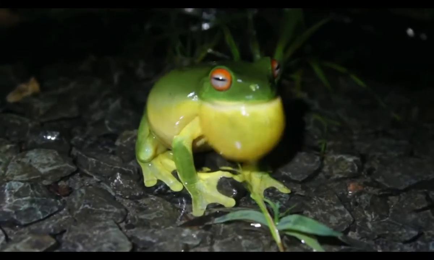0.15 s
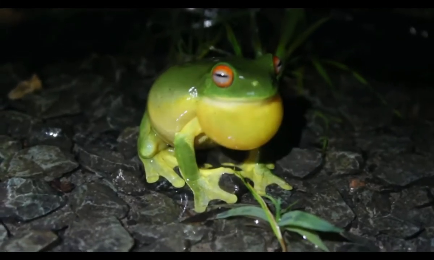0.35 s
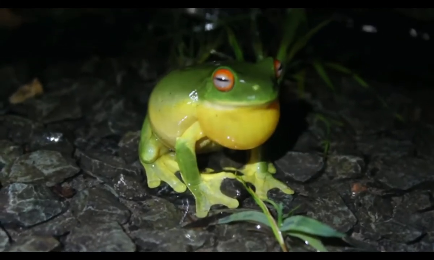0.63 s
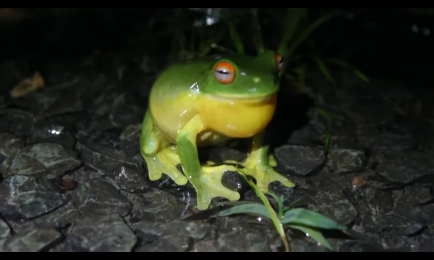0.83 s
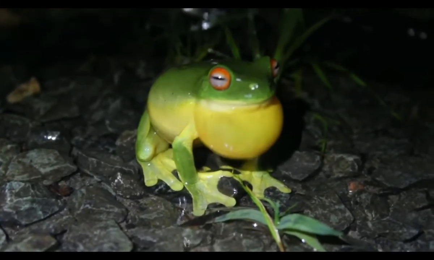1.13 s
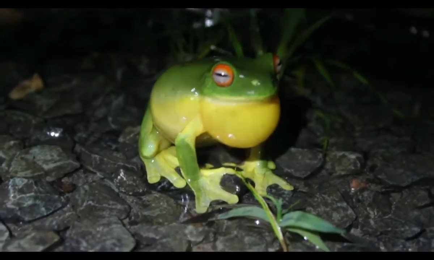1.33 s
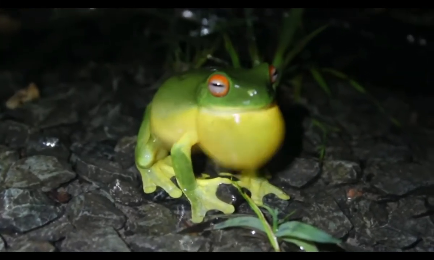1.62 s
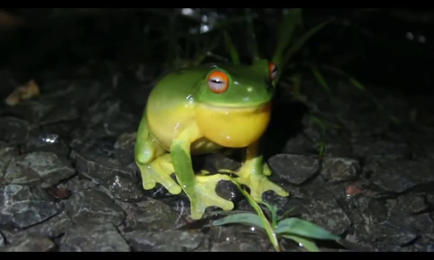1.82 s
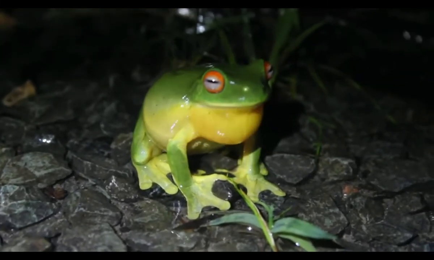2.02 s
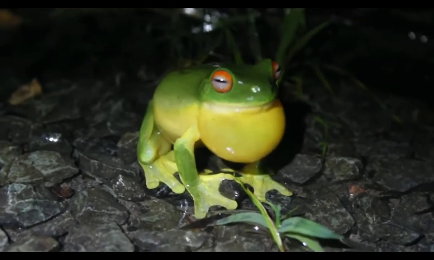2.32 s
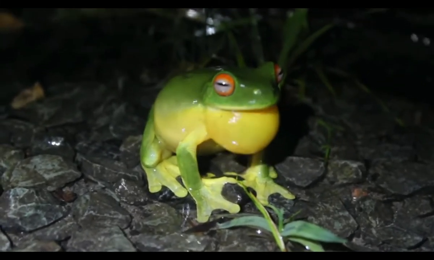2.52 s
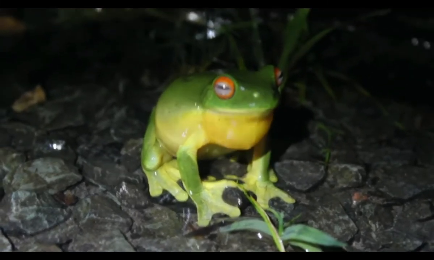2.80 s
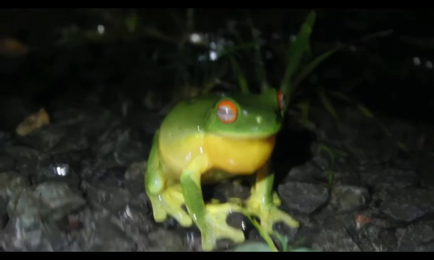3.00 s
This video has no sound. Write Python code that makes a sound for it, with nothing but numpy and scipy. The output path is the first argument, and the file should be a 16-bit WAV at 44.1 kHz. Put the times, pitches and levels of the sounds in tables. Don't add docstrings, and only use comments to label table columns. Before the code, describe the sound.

Two tree frogs call close to the microphone on wet ground at night, one with long nasal moans, the other answering in short falling trills, over soft rain hiss, ringing drips and faint chirps.

```python
import sys
import numpy as np
from scipy import signal
from scipy.io import wavfile
from scipy.ndimage import uniform_filter1d, map_coordinates

SR = 44100
rng = np.random.default_rng(int(sys.argv[2]) if len(sys.argv) > 2 else 0)


def pcm_store(signal):
    levels = np.round(np.clip(np.atleast_2d(signal), -1, 1) * 32767)
    wavfile.write(sys.argv[1], SR, levels.astype(np.int16).T)


def gain_from_db(level_db):
    decades = np.asarray(level_db, float) / 20
    return 10 ** decades


N = 138915


def rms_one(x):
    return x / np.sqrt(np.mean(x ** 2) + 1e-20)


def drift(rate_hz, size):
    knots = rng.standard_normal(int(size * rate_hz / SR) + 4)
    return map_coordinates(knots, [1 + np.arange(size) * rate_hz / SR], order=3)


def poles(hz, width_hz):
    r = np.exp(-np.pi * width_hz / SR)
    return [1, -2 * r * np.cos(2 * np.pi * hz / SR), r * r]


def peak(x, hz, width_hz):
    a = poles(hz, width_hz)
    return signal.lfilter([(1 - a[2]) / 2, 0, (a[2] - 1) / 2], a, x + 1e-18)


def glide(x, hz, width_hz):
    out, state = np.zeros(len(x)), np.zeros(2)
    for i in range(0, len(x), 128):
        a = poles(hz[i], width_hz)
        out[i:i + 128], state = signal.lfilter([sum(a)], a, x[i:i + 128], zi=state)
    return out


def high_pass(x, hz, order=4):
    return signal.sosfilt(signal.butter(order, hz, "high", fs=SR, output="sos"), x)


def pulses(rate_hz, top_hz):
    sharp = top_hz / rate_hz
    phase = 2 * np.pi * np.cumsum(rate_hz) / SR
    return top_hz * np.exp(sharp ** 2 * (np.cos(phase) - 1))


def clicks(s, size):
    out = np.zeros(N)
    np.add.at(out, np.clip((np.asarray(s) * SR).astype(int), 0, N - 1), size)
    return out


# (time [s], level [dB], pulse rate [Hz])
MOAN_CALLS = [
    [(0, -16.5, 210.3), (.03, -21, 200.6), (.21, -19.5, 208.9), (.26, -18, 215.9), (.4, -17.5, 220),
     (.44, -17, 217.2), (.53, -15.5, 213.2), (.556, -21, 189.6), (.58, -41, 137.5)],
    [(.95, -31.5, 178.4), (1.0, -24, 186.3), (1.085, -18, 190.3), (1.115, -19.5, 198.8), (1.41, -21, 210.1),
     (1.57, -15, 218.8), (1.715, -14.5, 213.1), (1.746, -16.5, 191), (1.768, -26, 135)],
    [(2.115, -31.5, 176.3), (2.24, -21.5, 187.7), (2.33, -17.5, 196.3), (2.584, -21, 205.3),
     (2.648, -16, 209.1), (2.796, -16, 220.8), (2.91, -15.5, 213.5), (2.941, -16, 193.3), (2.964, -25, 135)],
]
SAC_PER_RATE, SAC_WIDTH_HZ, SAC_WANDER = 8.005, 174, 0.005
HEAD_HZ, HEAD_RISE, HEAD_WIDTH_HZ = 2197, 2.88, 149
SAC_SLACK = 0.37
MOAN_LOW_HZ, MOAN_LOW_WIDTH_HZ, MOAN_PULSE_HZ = 795, 380, 4400
MOAN_EDGE_HZ, MOAN_EDGE_WIDTH_HZ, MOAN_EDGE_DB = 5050, 550, -37.5
MOAN_JITTER, MOAN_WOBBLE, MOAN_SHIMMER_DB = .005, .004, .9


def moan(rows):
    s, db, hz = np.transpose(rows)
    on = slice(int(s[0] * SR), int((s[-1] + 0.093) * SR))
    t = (np.arange(N) / SR)[on]
    plain_rate, level_db = np.interp(t, s, hz), np.interp(t, s, db)
    quiet = np.clip((-18 - level_db) / 4, 0, 1)
    wander = MOAN_JITTER * drift(62.56, len(t)) + MOAN_WOBBLE * quiet * drift(22.1, len(t))
    rate = plain_rate * (1 + wander)
    gain = gain_from_db(level_db + MOAN_SHIMMER_DB * drift(39.6, len(t))) * (t < s[-1])

    top = np.maximum.accumulate(plain_rate * np.clip(0.94 + t * 2, 0, 1))
    sac_hz = SAC_PER_RATE * top * (1 + SAC_WANDER * drift(6.6, len(t)))
    head = top - SAC_SLACK * np.maximum(top * 1.01 - plain_rate, 0)
    head_hz = HEAD_HZ + HEAD_RISE * (head - 184)

    def body(x):
        return glide(glide(x, sac_hz, SAC_WIDTH_HZ), head_hz, HEAD_WIDTH_HZ)

    puffs = pulses(rate, MOAN_PULSE_HZ)
    puffs = signal.lfilter([1, -2, 1], poles(MOAN_LOW_HZ, MOAN_LOW_WIDTH_HZ), puffs)
    puffs = high_pass(puffs, 500, order=2)
    edge = peak(peak(puffs, MOAN_EDGE_HZ, MOAN_EDGE_WIDTH_HZ), MOAN_EDGE_HZ, MOAN_EDGE_WIDTH_HZ)
    out = np.zeros(N)
    out[on] = body(puffs * gain) / np.std(body(puffs))
    out[on] += gain_from_db(MOAN_EDGE_DB) * gain * rms_one(edge)
    return out


# (pitch [Hz], width [Hz], level [dB])
THROAT_PEAKS = [(755, 260, 0.5), (1575, 410, 0), (1970, 265, -3), (2700, 140, -16), (3450, 260, -38.5),
                (5080, 320, -26)]


def throat(x):
    y = 0
    for k, (hz, width_hz, db) in enumerate(THROAT_PEAKS):
        y = y + (-1) ** k * gain_from_db(db) * peak(x, hz, width_hz)
    return high_pass(y, 650)


# (time [s], length [s], pitch [Hz], level [dB], bend over the note [share of pitch])
TRILL_CALLS = [
    [(.711, 0.016, 1040, -25.5, -0.13), (.739, 0.0092, 973, -17.5, 0.15), (.769, 0.0092, 942, -12, 0.034),
     (.801, 0.0086, 836, -12, -0.053), (.8325, 0.0097, 777, -10, -0.1), (.866, 0.0097, 754, -10, -0.057),
     (.914, 0.018, 609, -11.5, 0.13)],
    [(1.111, 0.016, 1050, -21.5, -0.012), (1.139, 0.0075, 1007, -13, 0.021),
     (1.171, 0.0076, 960, -9.5, 0.0019), (1.204, 0.0098, 819, -12, -0.048),
     (1.2345, 0.0097, 758, -11, -0.047), (1.2675, .009, 704.7, -10.5, -0.013),
     (1.302, 0.024, 650, -13.5, -0.032)],
    [(1.876, 0.016, 862, -21.5, -.08), (1.901, 0.0099, 893, -15, 0.068), (1.931, 0.01, 920, -10, 0.059),
     (1.964, 0.0079, 908, -11.5, -0.038), (1.997, 0.0084, 816, -11.5, -0.1),
     (2.0295, .011, 749, -10, -0.042), (2.0615, .01, 700, -10.5, -0.06), (2.096, 0.011, 661, -11, 0.094)],
    [(2.292, 0.019, 976, -20, -0.081), (2.319, .009, 892, -11.5, 0.025), (2.349, 0.0098, 860, -11, 0.025),
     (2.380, 0.0088, 815, -11.5, -0.064), (2.413, 0.01, 750, -11.5, -0.037),
     (2.446, .011, 715, -10.5, -0.035), (2.478, 0.027, 650, -14, -0.082)],
]
NOTE_ATTACK_S, NOTE_RELEASE_S, NOTE_FADE_DB_PER_S = 0.00048, 0.00305, 114
NOTE_SCOOP, SCOOP_S, NOTE_SAG = 0.2, 0.0038, 0.38
SOFT_START_S_PER_HZ, LEAD_SHARE = 4e-5, 0.515
TRILL_PULSE_HZ, DULL_PER_HZ = 5330, 0.0075
TRILL_JITTER, ROUGH_PER_HZ = .011, .008
EVEN_S = 0.00305


def trills():
    out, t = np.zeros(N), np.arange(int(.07 * SR)) / SR
    for s, length, hz, db, bend in sum(TRILL_CALLS, []):
        above_hz = max(hz - 800, 0)
        swell = SOFT_START_S_PER_HZ * above_hz
        s, length = s - LEAD_SHARE * swell, length + LEAD_SHARE * swell
        rise = np.clip(t / (NOTE_ATTACK_S + swell), 0, 1)
        fall = np.clip((length + NOTE_RELEASE_S - t) / (2 * NOTE_RELEASE_S), 0, 1)

        scoop = NOTE_SCOOP * np.clip(1 - t / SCOOP_S, 0, 1) ** 2
        arch = 1 - scoop + bend * (np.minimum(t / length, 1) - .5)
        sag = 1 - NOTE_SAG * (1 - fall) ** 1.58
        rough = TRILL_JITTER * (1 + ROUGH_PER_HZ * above_hz + 10 * (1 - fall))
        pitch = hz * arch * sag * (1 + rough * drift(417, len(t)))

        top_hz = TRILL_PULSE_HZ * min(1, gain_from_db(db + 14)) * np.clip(1 - DULL_PER_HZ * (hz - 800), .3, 1)
        note = throat(-pulses(pitch, top_hz))
        power = uniform_filter1d(note ** 2, int(EVEN_S * SR), mode="nearest")
        note = note / np.sqrt(power + 0.25 * np.var(note))
        shimmer_db = 1.02 * drift(498, len(t))
        note = note * rise * np.sqrt(fall) * gain_from_db(shimmer_db - NOTE_FADE_DB_PER_S * t)
        i = int(s * SR)
        out[i:i + len(t)] += gain_from_db(db) * note / np.std(note[:int(length * SR)])
    return high_pass(out, 480)


# (time [s], level [dB])
LONE_SLAPS = [(0.753, -27), (.766, -21), (0.78, -26), (0.787, -26), (0.8851, -13), (0.902, -11),
              (0.909, -6), (1.184, -9), (1.216, -7.5), (1.247, -25), (1.913, -17), (1.921, -15),
              (1.924, -27), (1.943, -6.5), (1.945, -19), (1.951, -20), (1.956, -17), (1.975, -4.5),
              (1.980, -18), (1.989, -21), (1.992, -15), (2.008, -19), (2.011, -14), (2.042, -31),
              (2.076, -11), (2.091, -16), (2.115, -22), (2.334, -13), (2.361, -13), (2.394, -15),
              (2.394, -16)]
ONSET_SLAP_DB, TAIL_SLAP_DB, TAIL_GAP_S = 3, -2, .003
CREAKS_PER_S, CREAK_DB, CREAK_FADE_DB_PER_S = 330, -1.5, 104
SLAP_HZ = 1110


def cord_slaps():
    s, db = np.transpose(LONE_SLAPS)
    slaps = clicks(s, gain_from_db(db))
    notes = np.array(sum(TRILL_CALLS, []))
    low = np.clip((1000 - notes[:, 2]) / 250, 0, 1)
    slaps += clicks(notes[:, 0], gain_from_db(notes[:, 3] + ONSET_SLAP_DB) * low)
    tail = np.cumsum(TAIL_GAP_S * (.5 + rng.random((len(notes), 3))), axis=1)
    tail_s = notes[:, :1] + notes[:, 1:2] + tail - TAIL_GAP_S
    slaps += clicks(tail_s.ravel(), gain_from_db(notes[:, 3:4] + TAIL_SLAP_DB - 200 * tail).ravel())
    for rows in TRILL_CALLS:
        start, span = rows[1][0], rows[-1][0] - rows[1][0]
        draw = rng.random((80, 2))
        at = np.cumsum((.3 + 1.4 * draw[:, 0]) / CREAKS_PER_S)
        creak_db = rows[2][3] + CREAK_DB - CREAK_FADE_DB_PER_S * at + 10 * (draw[:, 1] - .5)
        slaps += clicks(start + at, (at < span) * gain_from_db(creak_db))
    return 30 * peak(peak(slaps, SLAP_HZ, 900), 1.12 * SLAP_HZ, 560)


# (delay [s], level [dB])
REFLECTIONS = [(.0073, -23), (.0131, -24), (.0209, -18), (.034, -15), (.051, -29)]


def echoes(x):
    dull = peak(x, 2560, 2900)
    out = np.zeros(N)
    for k, (s, db) in enumerate(REFLECTIONS):
        late = np.r_[np.zeros(int(s * SR)), dull][:N]
        out += (-1) ** k * gain_from_db(db) * late
    return out


# (time [s], peak level [dB], pitch [Hz], splash level [dB])
NEAR_DRIPS = [(0.197, -25, 4070, -55), (0.242, -23, 10700, -41), (0.4422, -26.5, 4800, -40),
              (0.7784, -29, 10300, -43), (0.881, -31, 4260, -38), (0.92, -28, 4910, -35.5),
              (1.0824, -22.5, 6400, -38.5), (1.1246, -15, 5270, -35.5), (1.554, -20.5, 3790, -41),
              (1.8105, -12, 4170, -38), (1.9366, -17.5, 4850, -39), (1.9973, -21, 6960, -37.5),
              (2.1288, -21, 4200, -48), (2.1353, -14.5, 6800, -35), (2.2217, -15.5, 5800, -36),
              (2.231, -9.5, 3910, -37), (2.4133, -17, 6000, -36), (2.549, -29, 3950, -42),
              (2.659, -20.5, 4300, -41), (2.7507, -13.5, 5830, -47), (2.8404, -23, 11100, -41),
              (2.9268, -21.5, 5070, -39), (3.099, -19, 6800, -32), (3.1404, -17, 7700, -36),
              (.622, -28, 12000, -41), (0.763, -27, 4500, -46), (.9053, -22, 3650, -39),
              (1.0175, -24, 8100, -39.5), (1.5968, -21, 6500, -46.5), (1.712, -20.5, 5510, -49),
              (1.7685, -31, 4250, -37.5), (1.8392, -21, 5370, -43), (1.8861, -23, 9040, -38),
              (2.0405, -27, 6050, -47), (2.0612, -27, 5960, -43), (2.122, -31, 4480, -44),
              (2.694, -26, 6000, -46), (3.015, -29.5, 7080, -42), (3.056, -23, 5710, -49)]
DRIP_RING_CYCLES, SPLASH_DB, SPLASH_T60_S = 24.3, 7.5, 0.026


def drips():
    out, t = np.zeros(N + SR), np.arange(int(.03 * SR)) / SR
    for s, db, hz, splash_db in NEAR_DRIPS:
        noise = np.diff(rng.standard_normal(len(t) + 1))
        splash = noise * gain_from_db(SPLASH_DB + splash_db - 60 * t / SPLASH_T60_S)
        ring = np.sin(2 * np.pi * hz * t * (1 + 20 * t)) * gain_from_db(db - 60 * t * hz / DRIP_RING_CYCLES)
        i = int(s * SR)
        out[i:i + len(t)] += ring + splash
    return out[:N]


# (time [s], level [dB], pitch [Hz])
GROUND_KNOCKS = [
    (.195, -16.5, 596),
    (0.273, -37, 172),
    (2.997, -34, 90),
    (3.017, -25.5, 99),
    (3.044, -27.5, 600),
    (3.115, -38, 69.5),
]
KNOCK_CYCLES = 3.5


def knocks():
    out, t = np.zeros(N + SR), np.arange(SR // 4) / SR
    for s, db, hz in GROUND_KNOCKS:
        soft_start = 4 * (1 - np.exp(-2 * t * hz))
        i = int(s * SR)
        out[i:i + len(t)] += gain_from_db(db - 60 * t * hz / KNOCK_CYCLES) * np.sin(2 * np.pi * hz * t) * soft_start
    return out[:N]


# (time [s], peak level [dB])
NEAR_CHIRPS = [(0.4529, -34), (0.5743, -34), (0.6614, -37), (0.6774, -26), (0.888, -35), (0.9502, -35),
               (1.1054, -28), (1.1578, -35), (1.6342, -35), (1.6538, -32), (1.7672, -33), (1.958, -34.5),
               (2.0526, -27), (2.1505, -33), (2.2094, -33), (2.5057, -34), (2.5441, -28), (2.5695, -28),
               (2.631, -25.5), (2.6658, -24), (2.79, -28), (2.8255, -29), (2.8903, -27), (2.9097, -27),
               (2.9766, -35.5), (2.9929, -28), (3.0195, -29), (3.05, -29), (3.077, -30), (3.0959, -27.5),
               (3.1153, -25), (3.1296, -26), (3.1424, -28)]
CHIRP_HZ, NEAR_CHIRP_DB, NEAR_CHIRP_S = 2940, -1, 0.005
CHIRP_WIDTH_HZ, CHIRPS_PER_S, CHIRP_DB = 110, 75, -45


def chirpers():
    s, db = np.transpose(NEAR_CHIRPS)
    t = np.arange(int(.03 * SR)) / SR
    x = 2 * t / NEAR_CHIRP_S
    burst = np.sin(2 * np.pi * CHIRP_HZ * t) * np.e * x * np.exp(-x)
    near = signal.fftconvolve(clicks(s, gain_from_db(db + NEAR_CHIRP_DB)), burst)[:N]

    draw = rng.random((240, 2))
    at = np.cumsum((0.22 + 0.92 * draw[:, 0]) / CHIRPS_PER_S)
    ticks = clicks(at, gain_from_db(10 * draw[:, 1])) * gain_from_db(1.2 * drift(4.68, N))
    ticks[-1] = 0
    far = peak(peak(ticks, CHIRP_HZ, CHIRP_WIDTH_HZ), CHIRP_HZ * 0.83, 13 * CHIRP_WIDTH_HZ)
    return near + gain_from_db(CHIRP_DB) * rms_one(far)


def far_trill():
    start_s, gap_s, hz, db = .075, .032, 700, -34.5
    t = np.arange(int(.03 * SR)) / SR
    note = np.sin(2 * np.pi * hz * t) * np.sin(np.pi * np.minimum(t / .016, 1))
    return signal.fftconvolve(clicks(start_s + gap_s * np.arange(3), gain_from_db(db)), note)[:N]


# (pitch [Hz], width [Hz], level [dB])
CHORUS_BANDS = [(1360, 410, -45), (1730, 420, -40.5), (2210, 220, -43.5)]
CHORUS_THROB_DB = 2.5


def chorus():
    out = np.zeros(N)
    for hz, width_hz, db in CHORUS_BANDS:
        band = peak(peak(rng.standard_normal(N), hz, width_hz), hz, width_hz)
        out += gain_from_db(db + CHORUS_THROB_DB * drift(60, N)) * rms_one(band)
    return out


PATTER_PER_S, PATTER_DB = 120, -54


def patter():
    size = gain_from_db(8.6 * np.minimum(rng.exponential(1, N), 4))
    born = (rng.random(N) < PATTER_PER_S / SR) * size
    dealt = rng.integers(0, 10, N)
    out = np.zeros(N)
    for k, hz in enumerate(np.geomspace(3500, 14000, 10)):
        out += peak(born * (dealt == k), hz, 0.085 * hz)
    return gain_from_db(PATTER_DB) * rms_one(out)


# (pitch [Hz], level [dB])
AIR_TONE = [(24, -31), (45, -25), (100, -6), (370, -7), (1000, -4.5), (3500, -7), (7000, -13), (16000, -17)]
AIR_DB, AIR_PATCHY_DB = -38.5, 1.53


def air():
    out, together = np.zeros(N), drift(60, N)
    edges = 22 * 2 ** np.arange(0, 9.7, .5)
    white = rng.standard_normal((2, N))
    hz, db = np.transpose(AIR_TONE)
    for k, (low, high) in enumerate(zip(edges, edges[1:])):
        band_pass = signal.butter(2, [low, high], "band", fs=SR, output="sos")
        band = signal.sosfilt(band_pass, white[k % 2])
        band_db = np.interp(np.log(low * high) / 2, np.log(hz), db)
        out += band * gain_from_db(band_db + AIR_PATCHY_DB * (together + drift(20, N)))
    return gain_from_db(AIR_DB) * rms_one(out)


def scene():
    frogs = sum(moan(rows) for rows in MOAN_CALLS) + trills() + cord_slaps()
    water = drips() + knocks() + patter()
    far = chirpers() + far_trill() + chorus()
    return (frogs + echoes(frogs) + water + far + air())[None]


def band_limit(x):
    return signal.sosfilt(signal.butter(12, 16690, fs=SR, output="sos"), x)


# (time [s], level [dB])
FADE_IN = [(0, -16), (.06, -13.5), (.35, -8), (.71, -4.5)]
LIFT_DB_PER_DB, LIFT_FROM_DB, LIFT_S = 0.0841, -22.5, 0.17
TREBLE_LIMIT_HZ = 16150


def record(dry):
    level_db = 10 * np.log10(uniform_filter1d(dry[0] ** 2, int(LIFT_S * SR)) + 1e-9)
    lift_db = LIFT_DB_PER_DB * np.maximum(level_db - LIFT_FROM_DB, 0)
    fade_db = np.interp(np.arange(N) / SR, *np.transpose(FADE_IN))
    low_pass = signal.cheby2(12, 60, TREBLE_LIMIT_HZ, fs=SR, output="sos")
    mix = signal.sosfilt(low_pass, dry) * gain_from_db(lift_db + fade_db)
    return band_limit(mix)


dry = scene()
out = record(dry)
pcm_store(out)
```